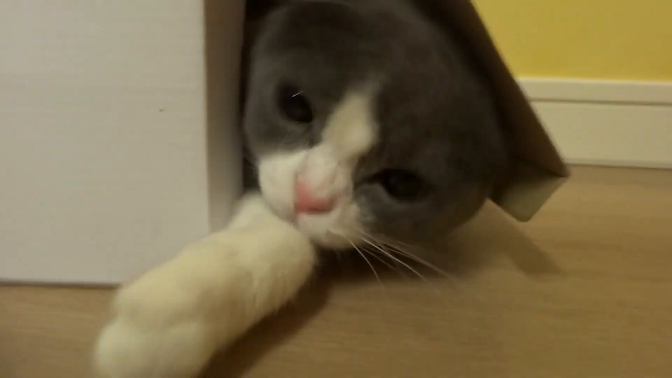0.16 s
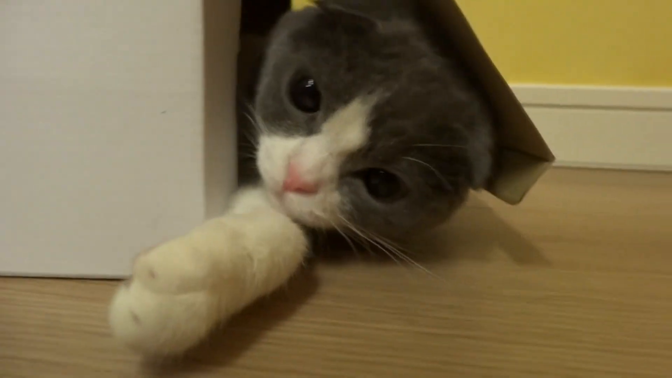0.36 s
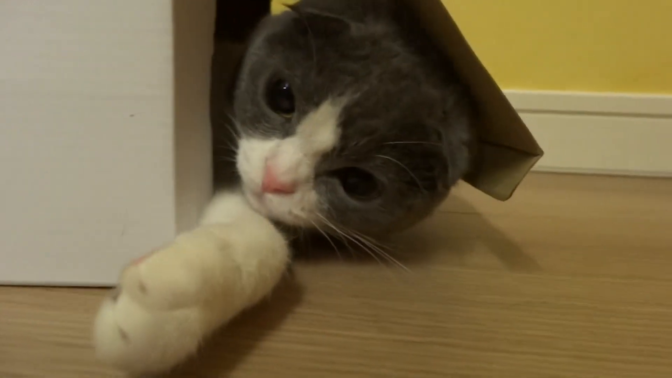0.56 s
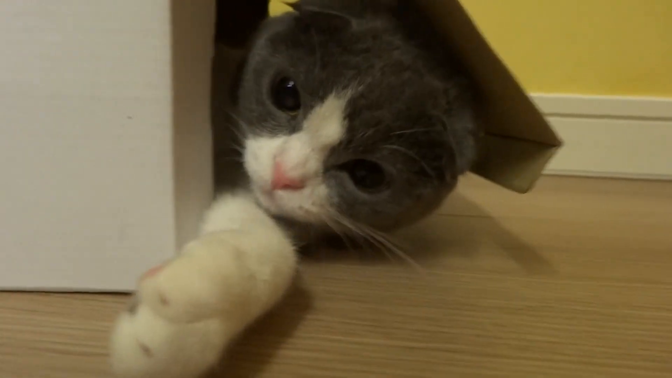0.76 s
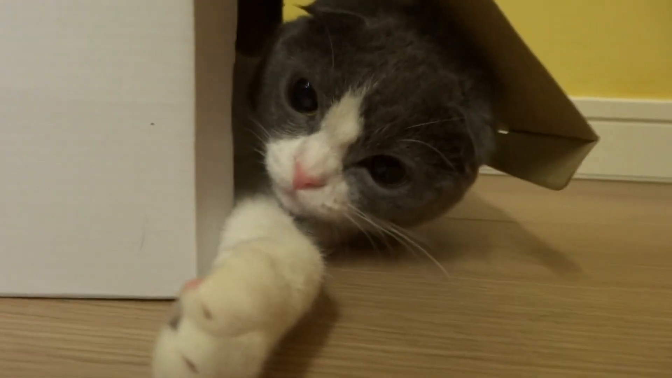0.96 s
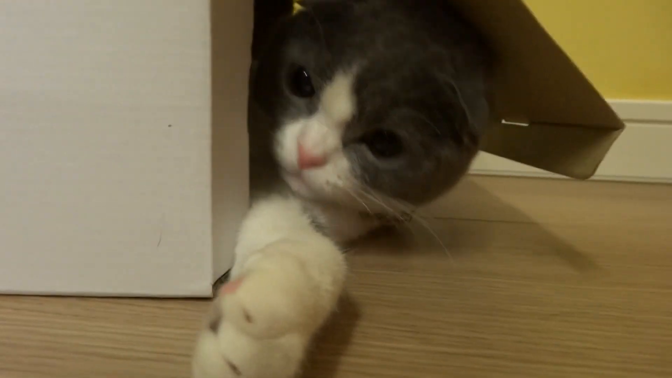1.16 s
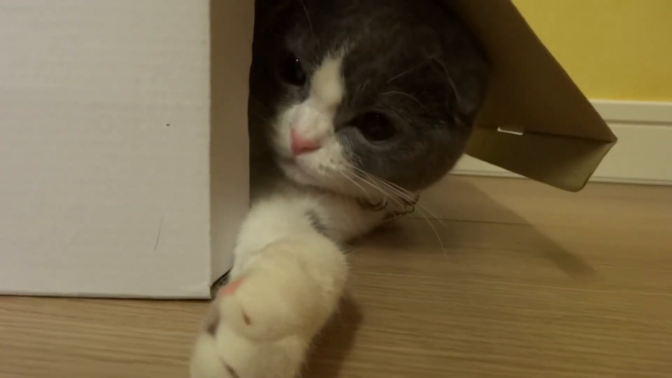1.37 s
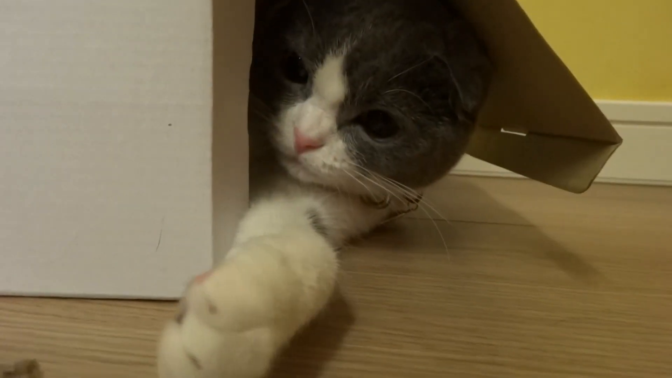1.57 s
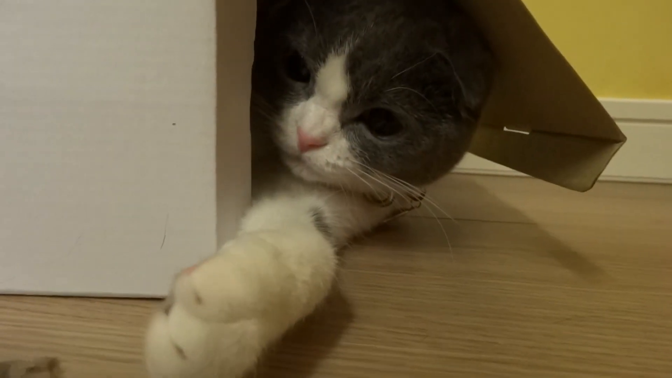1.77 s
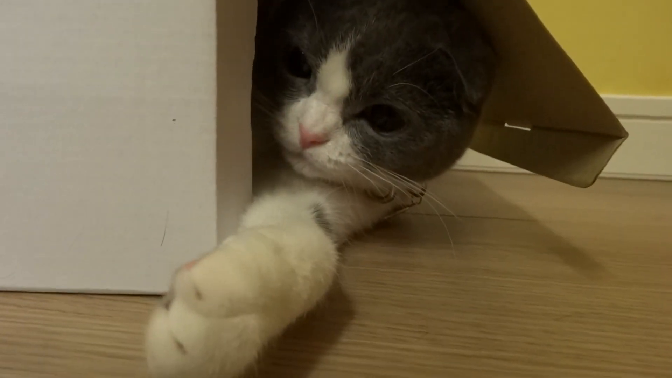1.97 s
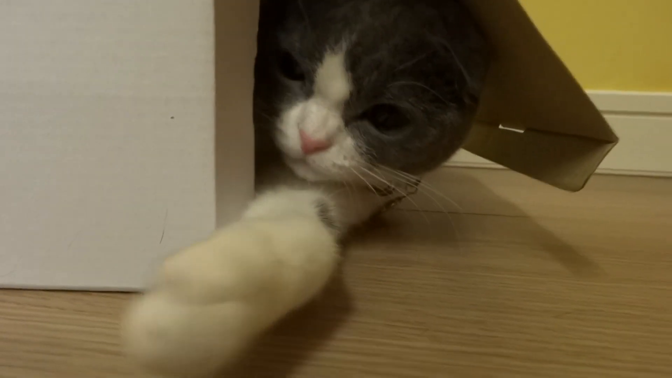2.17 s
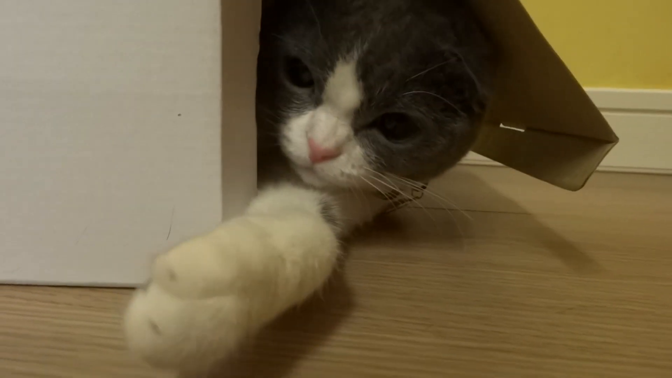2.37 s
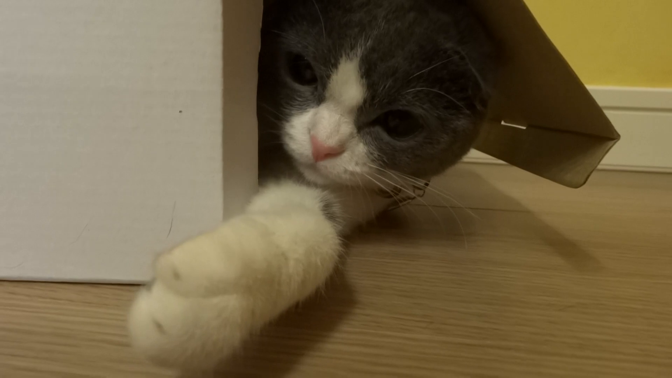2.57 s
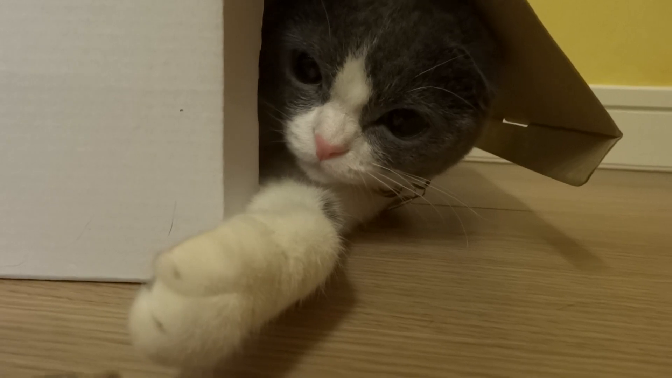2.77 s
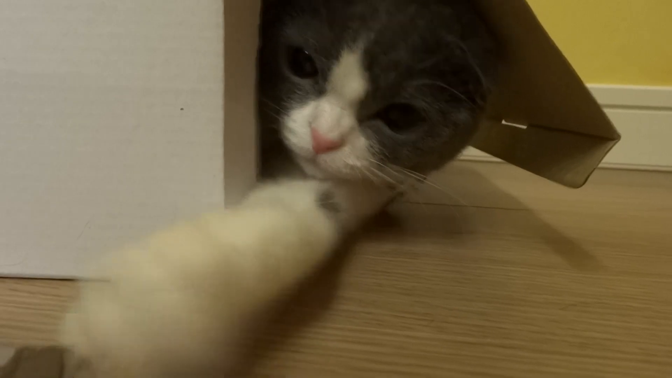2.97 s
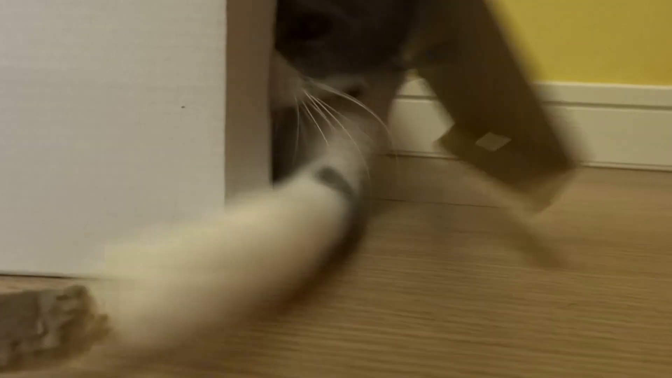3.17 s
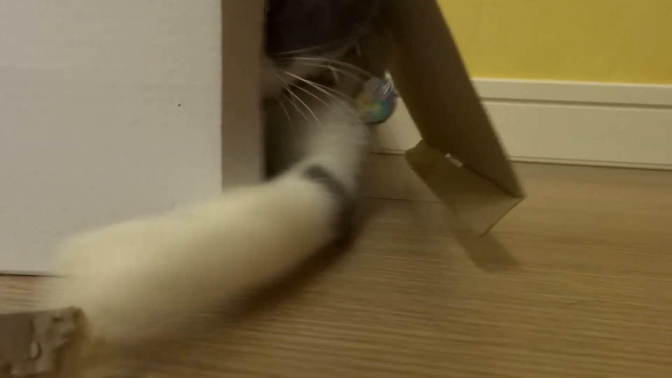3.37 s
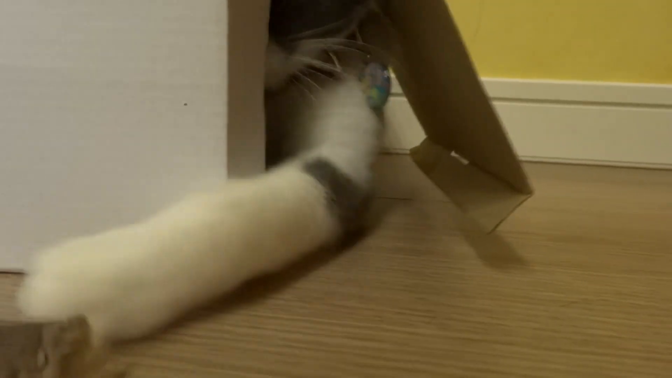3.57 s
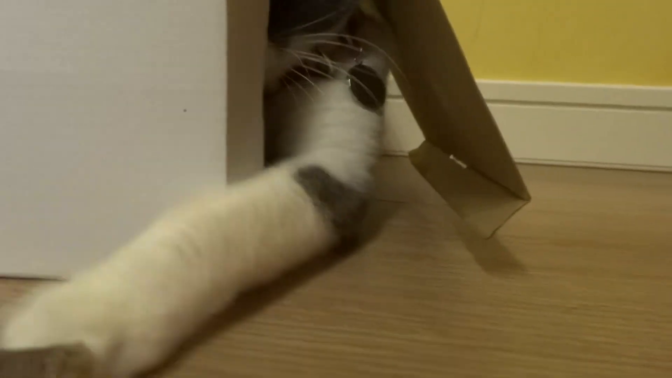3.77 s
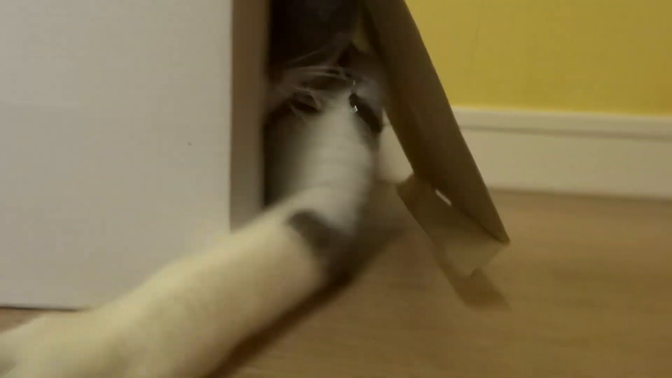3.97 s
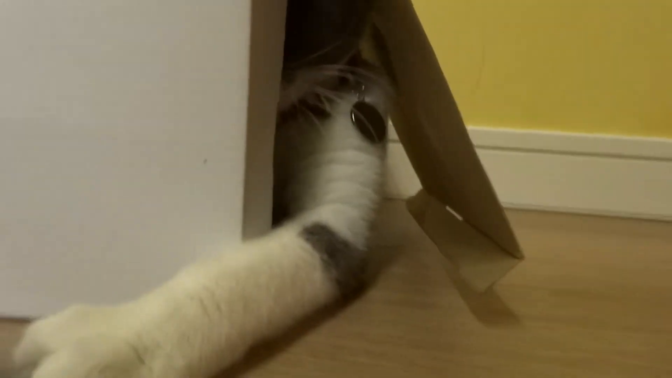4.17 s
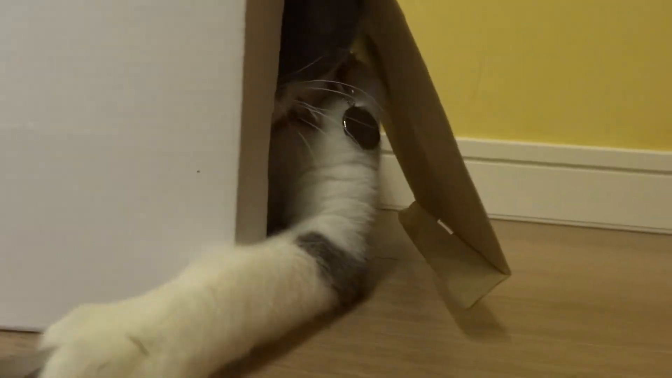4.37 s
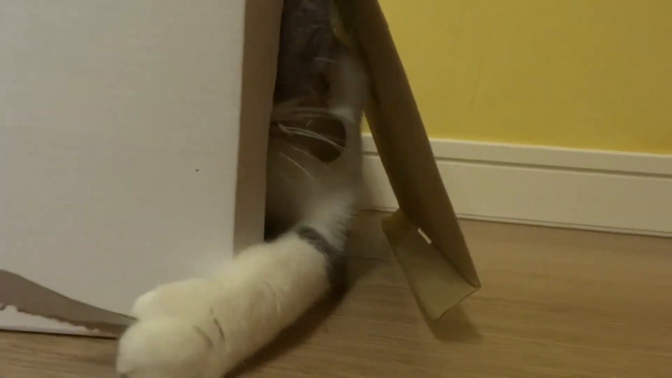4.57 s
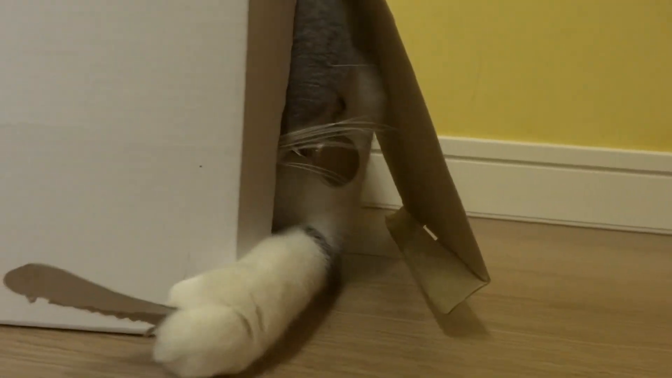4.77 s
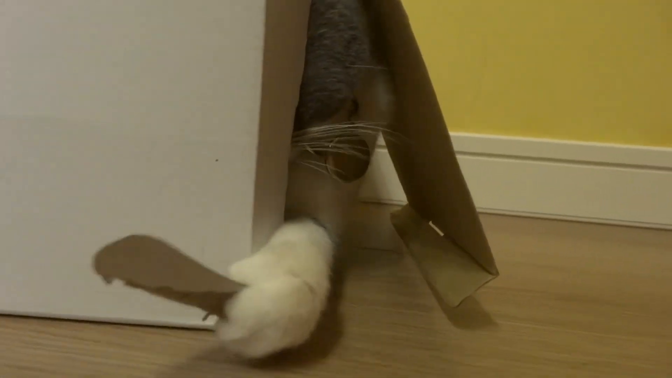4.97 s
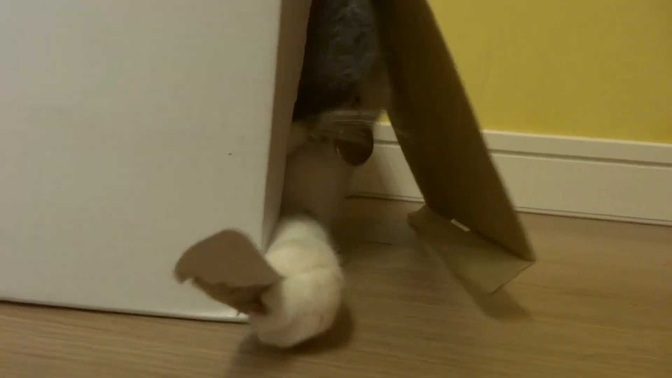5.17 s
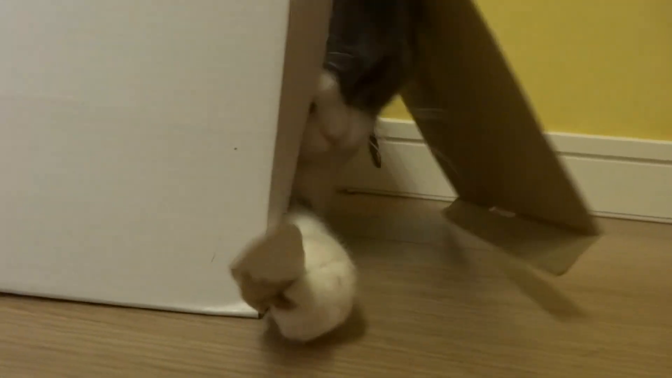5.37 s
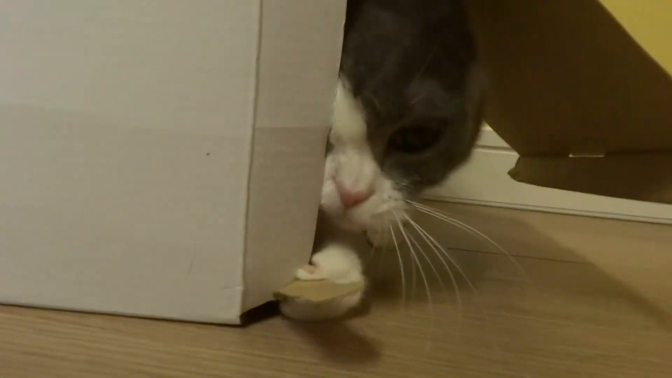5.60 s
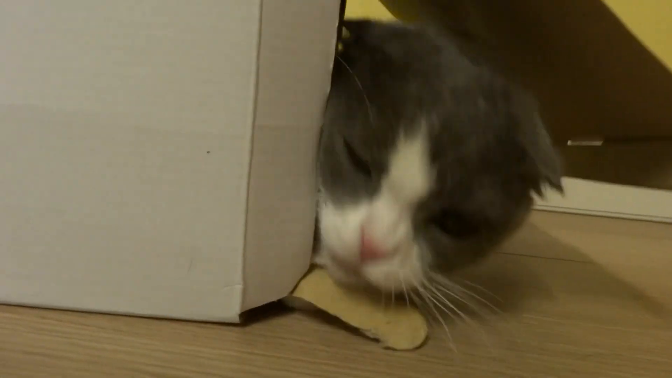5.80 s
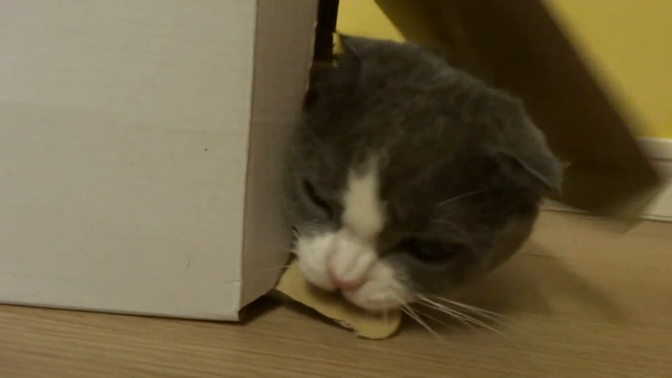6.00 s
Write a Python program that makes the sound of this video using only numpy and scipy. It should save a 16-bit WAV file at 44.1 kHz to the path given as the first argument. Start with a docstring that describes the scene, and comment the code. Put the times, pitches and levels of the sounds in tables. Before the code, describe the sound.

A close, dry perspective in a small quiet room with a faint steady hush. From 0 to 1.5 s, fur slides softly and unevenly along cardboard, with gentle hissing drags at the start, 0.2 and 0.7 s. It then nearly dies away until 2.8 s, leaving thin ringing ticks, two faint brushes near 2.2 s and tiny claw clicks at 2.6 s. Around 3.1 to 3.3 s come creaks, a boxy knock, a very sharp claw click and quick rasping swipes. Short scratchy strokes follow at 3.55, 3.77 and, strongest, 4.0 s, then a snap near 4.2 s and bright scrapes around 4.45 s. From 4.6 to 5.0 s the flap crackles in a dense run of snaps with a thump at 4.73 s. After lighter rubbing, loud hollow bumps and snaps hit at 5.5 and 5.7 s as the box judders; a final scuffing shove ends at 6 s.

```python
"""A cat wriggles in a cardboard box on a wooden floor, close to the microphone in a small room.
Fur slides softly along the card with a few drags, dies down for a while, and faint ticks ring.
Then a paw swipes, strokes and claws at the card and the flap creaks; bumps, soft low thuds of a paw and
late shoves make the hollow box boom. Rubbing is shaped noise; knocks and snaps are fading tones and noise."""
import sys
import numpy as np
from scipy import signal
from scipy.fft import rfft, irfft, next_fast_len
from scipy.io import wavfile

SR = 44100
rng = np.random.default_rng(int(sys.argv[2]) if len(sys.argv) > 2 else 0)


def store_wav(level_fs):
    """Save 16-bit WAV to argv[1]."""
    pcm = np.round(np.clip(np.atleast_2d(level_fs), -1, 1) * 32767)
    wavfile.write(sys.argv[1], SR, pcm.T.astype(np.int16))


N = 266364  # about 6 seconds
T = np.arange(N) / SR
RING_T = T[:SR // 3]

# colour of the thin card walls when shaken: (frequency [Hz], level [dB])
PANEL_COLOUR = [(30, -36), (70, -14), (170, -8), (400, 2), (700, -0.5), (1150, 4), (1600, -1), (2200, -2),
                (3500, -7), (8000, -54)]


def undb(db):
    """Turn decibels into a gain."""
    return 10 ** (np.asarray(db) / 20)


def unit(x):
    """Scale to an average (rms) level of 1."""
    return x / np.sqrt(np.mean(x ** 2))


def crest(x):
    """Scale so that the highest peak is 1."""
    return x / np.abs(x).max()


def add(track, s, sound):
    """Mix a sound into a track from time s (seconds) on."""
    start = max(int(s * SR), 0)
    track[start:start + len(sound)] += sound[:N - start]


def colour(x, points, tilt_db=0):
    """Shape a sound by (Hz, dB) points, with a tilt in dB per octave above 1 kHz; rms 1."""
    hz, db = np.transpose(points)
    size = next_fast_len(len(x))
    octave = np.log2(np.maximum(np.fft.rfftfreq(size, 1 / SR), 1))
    shape_db = np.interp(octave, np.log2(hz), db)
    tilt = tilt_db * np.maximum(octave - 10, 0)  # octave 10 is 1024 Hz
    spectrum = rfft(x, size) * undb(shape_db + tilt)
    return unit(irfft(spectrum, size)[:len(x)])


def soften(x, hz, kind="low"):
    """Gently cut the sound above hz, or below it if kind is "high" (two-pole filter)."""
    return signal.sosfilt(signal.butter(2, min(hz, SR / 2 - 1), kind, fs=SR, output="sos"), x)


def resonate(x, hz, sharpness):
    """Keep a band around hz, with gain 1 at its centre."""
    return signal.lfilter(*signal.iirpeak(hz, sharpness, fs=SR), x)


def fade(t60):
    """A ring dies away exponentially, by 60 dB in t60 seconds."""
    return np.exp(-np.log(1000) * RING_T / t60)


def mode(hz, t60):
    """One struck resonance: a pure tone that fades."""
    return np.sin(2 * np.pi * hz * RING_T) * fade(t60)


def slips(count, spread_db):
    """Dense friction: countless fibres let go, a few much harder than the rest."""
    extra_force = np.minimum(rng.exponential(size=count), 3)
    return rng.standard_normal(count) * undb(spread_db * extra_force)


def waver(count, hz, depth_db):
    """A gain that wanders at random, with hz new random levels per second."""
    knots = rng.standard_normal(int(count * hz / SR) + 2)
    wander = np.interp(np.arange(count) * hz / SR, np.arange(len(knots)), knots)
    return undb(depth_db * wander)


def stroke(s, rise, fall):
    """Start time and uneven grip of a movement that swells to its peak at s and dies away."""
    start = max(s - 2.5 * rise, 0)
    t = T[:2 * SR // 3] + start - s
    swell = np.exp(-(t / rise) ** 2)
    dying = np.exp(-np.abs(t) / fall)
    speed = np.where(t < 0, swell, dying)
    return start, speed * waver(len(t), hz=358.6, depth_db=1.5)


def box_ring(dense_db=-5, dense_t60=0.24, scatter_db=2.0):
    """The hollow box's main tones, differently mixed each time, over a wash of panel modes."""
    # main tones of the box: (frequency [Hz], typical level [dB])
    box_modes = [(142, -14.5), (192, -12), (228, -11), (298, -11.5), (385, 9), (446, -2), (512, 0),
                 (575, 1), (672, 1.5), (798, -1.5), (957, -3.5), (1195, 1.5), (1295, -21), (1520, -4),
                 (1900, 3.5), (2130, 1.5)]
    longest_t60 = 0.18  # seconds
    chance = rng.standard_normal(len(box_modes))
    ring = 0
    for k, (hz, db) in enumerate(box_modes):
        t60 = longest_t60 * min(400 / hz, 1) ** .25  # high tones die sooner
        sign = (-1) ** (k // 2)
        ring = ring + sign * undb(db + scatter_db * chance[k]) * mode(hz, t60)
    wash = colour(rng.standard_normal(len(RING_T)), PANEL_COLOUR) * fade(dense_t60)
    return unit(unit(ring) + undb(dense_db) * unit(wash))


def rasp(grip, tilt_db, echo_share=0.4):
    """Slips on the card, combed by echoes from the floor and the near wall."""
    # colour of scraped card: (frequency [Hz], level [dB])
    scrape_colour = [(100, -21), (700, -1.5), (1750, -3), (2400, 6), (3400, 3), (4200, -3), (5300, 1.5),
                     (6500, -1.5), (7700, 2), (9500, -3.5), (11500, -3), (13500, -2.5), (16000, -15)]
    sound = colour(slips(len(grip), spread_db=3.0), scrape_colour, tilt_db)
    lags = rng.uniform(.0004, .002, 2)  # seconds
    echoes = sum(np.roll(sound, int(lag * SR)) for lag in lags)
    return grip * unit(sound + echo_share * echoes)


def shudder(grip, ring_db):
    """Coarse slips shake the panels and set the hollow box ringing."""
    shake = slips(len(grip), spread_db=6)
    ring = signal.fftconvolve(unit(shake) * grip, box_ring())[:len(grip)] / np.sqrt(len(RING_T))
    panels = grip * colour(shake, PANEL_COLOUR)
    return (panels + undb(ring_db) * ring) / np.sqrt(2)


def knock(hz, boom_db, slap_cycles=9, reach=1.49, bass_share=0.63, box_bass_hz=170):
    """A short slap and the box's boom; a soft, low thud leaves out the higher modes."""
    slap = soften(mode(hz, slap_cycles / hz), reach * hz)
    slap = soften(slap, bass_share * hz, "high")
    boom = soften(soften(box_ring(), reach * hz), box_bass_hz, "high")
    return crest(slap) + undb(boom_db) * crest(boom)


def snap(hz, crackle_db, crackle_t60, cycles=4.1, bright=1.44):
    """A snap that dies within a few cycles, and a crackle of fibres that lasts longer."""
    click = soften(mode(hz, cycles / hz), hz / 2, "high")
    click = crest(soften(click, bright * hz))
    crackle = crest(resonate(rng.standard_normal(len(RING_T)), hz, 1.0) * fade(crackle_t60))
    return click + undb(crackle_db) * crackle


def place(x, pan_db, room_db, t60=0.31, apart_db=-4):
    """Close sound plus the small room's echo, whose bass is the same at both microphones."""
    after_gap = RING_T > .005  # the echo starts 5 ms late
    shared, apart = rng.standard_normal((2, len(RING_T))) * fade(t60) * after_gap
    side = undb(apart_db) * resonate(apart, 1050, 0.24)
    tails = unit(np.array([shared + side, shared - side])) / np.sqrt(len(RING_T))
    echo = signal.fftconvolve(x[None], tails, axes=1)[:, :N]
    left_right = np.array([[1], [-1]])
    return (x + undb(room_db) * echo) * undb(left_right * pan_db / 2)  # positive leans left


def from_left(pair, shade_hz=5000, share=0.26):
    """The phone's body shades the right microphone: a band near 5 kHz is lifted left, cut right."""
    return pair + share * resonate(pair, shade_hz, 2.2) * np.array([[1], [-1]])


def room_hush():
    """The steady quiet noise of the room."""
    # colour of the quiet room: (frequency [Hz], level [dB])
    quiet_colour = [(30, -6), (120, -2), (400, 10), (2000, -20), (8000, -4), (15000, -11)]
    return undb(-65.5) * colour(rng.standard_normal(N), quiet_colour)


def ticks(t60=0.19, sharpness=11):
    """Faint ticks, each ringing in a narrow cluster of tones."""
    # (time [s], peak level [dB], pitch [Hz])
    tick_events = [(1.5848, -49, 3670), (1.6303, -45, 5800), (1.688, -46, 8250), (2.316, -44, 7780),
                   (2.4653, -51.5, 2010), (2.496, -49, 8350), (2.6444, -45, 8440), (2.7038, -50.5, 1930),
                   (3.345, -34.5, 1630), (3.702, -44, 2060)]
    out = np.zeros(N)
    for s, db, hz in tick_events:
        cluster = resonate(rng.standard_normal(len(RING_T)), hz, sharpness)
        cluster = resonate(cluster, hz, sharpness / 2)
        add(out, s, undb(db) * crest(cluster * fade(t60)))
    return out


def fur(murmur_db=-4, rub_db=-1.0, hiss_db=-3, murmur_follow=0.74, usual_db=-50):
    """Fur slides with wavering pressure; one effort drives panel murmur, rub and fine hiss."""
    # how briskly the fur slides: (time [s], level [dB])
    slide_effort = [(0, -53), (.42, -47), (.54, -52.5), (.94, -51), (1.02, -54.5), (1.17, -50),
                    (1.48, -51.5), (1.68, -64.5), (2.78, -69), (2.87, -56), (3.28, -51), (3.5, -62),
                    (3.97, -58), (4.19, -48), (4.74, -50), (5.04, -44), (5.6, -47), (6.04, -50.5)]
    # colour of the murmuring panels: (frequency [Hz], level [dB])
    murmur_colour = [(40, -24), (120, -9.5), (220, -10), (380, 1.5), (550, 3), (900, 5), (2000, -1),
                     (3000, -21), (6000, -63)]
    # colour of the rubbing: (frequency [Hz], level [dB])
    rub_colour = [(900, -18), (1800, -3), (2400, 6.5), (3500, 1.5), (4500, 0.5), (5600, -2), (8000, -10.5)]
    # colour of the fine hiss: (frequency [Hz], level [dB])
    hiss_colour = [(3500, -27), (6000, -1), (8200, -1), (10500, -1), (14000, -4), (16000, -9)]
    # echoes from the near wall and floor of the box: (delay [s], share [gain])
    near_echoes = [(.00062, 0.18), (.00135, 0.074), (.0024, 0.073)]
    effort = np.interp(T, *np.transpose(slide_effort))
    murmur = usual_db + murmur_follow * (effort - usual_db)  # the murmur changes less than the rub
    layers = [(murmur + murmur_db, murmur_colour), (effort + rub_db, rub_colour),
              (effort + hiss_db, hiss_colour)]
    sound = sum(undb(db) * colour(slips(N, spread_db=4.0), shape) for db, shape in layers)
    sound = sound * waver(N, hz=59.36, depth_db=1.93)
    return sound + sum(share * np.interp(T - lag, T, sound) for lag, share in near_echoes)


def drags(sharpness=4.3, fall_share=1.21):
    """Drags and strokes of paw and flank, some brief, some longer, hiss; the card sings in one band."""
    # (time of peak [s], level [dB], swell time [s], tilt [dB per octave],
    #  singing pitch [Hz], lift of that pitch [dB])
    drag_events = [(0.0, -42.5, 0.037, 2.5, 2400, 6.5), (0.23, -42, 0.061, -2, 890, 13.5),
                   (0.67, -38.5, 0.084, 6, 3640, 10), (2.099, -46.5, 0.073, 3.5, 4170, 6.5),
                   (2.225, -46.5, 0.023, 4.5, 4130, 7.5), (4.035, -27.5, .025, 1.5, 5240, 5.5),
                   (4.08, -31.5, .033, .5, 2340, 7.5), (4.368, -32.5, .007, 1, 700, 20),
                   (4.425, -28.5, .036, -0.5, 8140, 6.5), (4.463, -22.5, 0.012, 3, 8900, 11),
                   (4.507, -25.5, 0.022, 0, 3900, 14.5), (5.25, -41.5, .045, -1.5, 11500, 14),
                   (5.37, -43, 0.02, 11, 10500, 11), (5.535, -25.5, 0.017, 4.5, 2100, 15),
                   (5.78, -43, 0.14, 7, 12300, 11), (6.015, -36.5, 0.031, 5, 2350, 19)]
    out = np.zeros(N)
    for s, db, swell, tilt_db, sing_hz, sing_db in drag_events:
        start, grip = stroke(s, swell, fall_share * swell)
        hiss = rasp(grip, tilt_db)
        sung = hiss + (undb(sing_db) - 1) * resonate(hiss, sing_hz, sharpness)
        add(out, start, undb(db) * unit(sung) * np.std(hiss))  # singing adds no loudness
    return out


def swipes(ring_db=-10, rise=0.0065, fall=0.0087):
    """Quick swipes of the paw, with one rise and fall time (s), rasp and shake the box."""
    # (time of peak [s], rasp level [dB], box shaking level [dB], tilt of the rasp [dB per octave])
    swipe_events = [(3.123, -31.5, -30.5, 7.5), (3.297, -33, -33, -11), (3.316, -26.5, -23, 3.5),
                    (3.537, -28.5, -35.5, 4), (3.552, -26.5, -36, 1), (3.756, -37.5, -40.5, 3.5),
                    (3.776, -27, -33, 1), (3.984, -32, -44, 0.5), (4.0, -19.5, -38, 4),
                    (4.136, -29, -53, -2.5), (4.165, -27.5, -60, 0), (4.263, -37.5, -69, -0.5),
                    (5.897, -37.5, -36.5, 4), (5.965, -34, -32, -9), (5.979, -28, -23, 3.5),
                    (5.998, -28.5, -28.5, 8)]
    out = np.zeros(N)
    for s, db, shake_db, tilt_db in swipe_events:
        start, grip = stroke(s, rise, fall)
        scrape = undb(db) * rasp(grip, tilt_db)
        shake = undb(shake_db) * shudder(grip, ring_db)
        add(out, start, scrape + shake)
    return out


def claws(claw_hz=10000):
    """Claw tips catch and click, too light to move the box."""
    # (time [s], peak level of the click [dB])
    claw_events = [(2.607, -32.5), (2.633, -31), (3.143, -21), (3.27, -7), (5.322, -14.5), (5.574, -12.5),
                   (5.642, -17.5)]
    out = np.zeros(N)
    for s, db in claw_events:
        add(out, s, undb(db) * snap(claw_hz, crackle_db=-7.5, crackle_t60=0.013))
    return out


def creases(crease_hz=3150, flap_hz=600, flap_t60=0.049, flap_db=-17, boom_db=-20, pitch_scatter=0.014):
    """Creases give way as the flap bends: each snaps at nearly one pitch and shakes flap and box."""
    # (time [s], peak level of the click [dB])
    crease_events = [(3.036, -25.5), (3.102, -28), (3.118, -28), (3.1791, -25), (4.183, -12),
                     (4.605, -19.5), (4.733, -15.5), (4.754, -17.5), (4.759, -17), (4.7637, -21),
                     (4.776, -17.5), (4.7792, -16.5), (4.8308, -11.5), (4.8639, -11.5), (4.8829, -12.5),
                     (4.892, -16), (4.9099, -17), (5.0064, -21.5), (5.492, -12.5), (5.515, -5.5),
                     (5.6138, -17.5), (5.6225, -16), (5.6913, -5.5), (5.751, -20), (5.894, -20.5),
                     (5.899, -22)]
    out = np.zeros(N)
    for s, db in crease_events:
        hz = crease_hz * np.exp(pitch_scatter * rng.standard_normal())
        click = snap(hz, crackle_db=-10.5, crackle_t60=0.017)
        body = undb(flap_db) * mode(flap_hz, flap_t60) + undb(boom_db) * crest(box_ring())
        add(out, s, undb(db) * (click + soften(body, 220, "high")))
    return out


def shoves(ring_db=0, fall_share=1.78):
    """The whole box is shoved and judders over the floor."""
    # (time of peak [s], level [dB], swell time [s])
    shove_events = [(0.0, -47, 0.024), (5.475, -38.5, .01), (5.515, -25.5, .016), (5.598, -33, .018),
                    (5.66, -33.5, .055), (5.708, -29, .028), (6.0, -31, 0.034)]
    out = np.zeros(N)
    for s, db, swell in shove_events:
        start, grip = stroke(s, swell, fall_share * swell)
        add(out, start, undb(db) * shudder(grip, ring_db))
    return out


def bumps(pat_hz=578, pat_boom_db=-11):
    """Bumps against the box and soft low thuds of a paw make the box boom; pats on the floor join in."""
    # (time [s], slap level [dB], boom level [dB], slap pitch [Hz])
    bump_events = [(3.179, -11.5, -15, 820), (3.396, -40.5, -43.5, 137), (3.431, -39, -40, 350),
                   (3.64, -42.5, -43.5, 140), (4.731, -15, -18, 560), (4.792, -29, -32, 650),
                   (5.081, -38, -34, 424), (5.103, -25.5, -30.5, 1110), (5.4913, -9.5, -12.5, 1040),
                   (5.499, -20, -12.5, 232), (5.506, -21, -10, 386), (5.523, -20, -14.5, 390),
                   (5.614, -19.5, -21, 1150), (5.641, -22, -25, 385), (5.695, -9, -13, 1025),
                   (5.879, -25, -34.5, 1060)]
    # (time [s], peak level of the slap [dB])
    pat_events = [(4.134, -36), (4.314, -35.5), (4.363, -32), (5.007, -19)]
    out = np.zeros(N)
    for s, slap_db, boom_db, hz in bump_events:
        add(out, s, undb(slap_db) * knock(hz, boom_db - slap_db))
    for s, db in pat_events:
        add(out, s, undb(db) * knock(pat_hz, pat_boom_db))
    return out


def scene():
    """All of the cat's movements over the hush of the room."""
    # where the fur rubs: (time [s], left minus right [dB])
    slide_pan = [(.4, -1.5), (.6, 2.5), (4.8, 1.1), (5.2, -0.5)]
    fur_pan_db = np.interp(T, *np.transpose(slide_pan))
    slide = place(fur() + ticks(), pan_db=fur_pan_db, room_db=-5.5)
    paws = from_left(place(swipes() + drags(), pan_db=0.66, room_db=-14))
    clicks = place(creases() + claws(), pan_db=0.2, room_db=-13.0)
    box = place(bumps() + shoves(), pan_db=0.16, room_db=-16.5)
    return slide + paws + box + clicks + room_hush()


def record(dry, bass_hz=50, top_hz=15700):
    """The phone loses the deep bass and cuts the top steeply."""
    without_bass = soften(dry, bass_hz, "high")
    return signal.sosfilt(signal.ellip(8, .2, 70, top_hz, fs=SR, output="sos"), without_bass)


dry = scene()
out = record(dry)
store_wav(out)
```